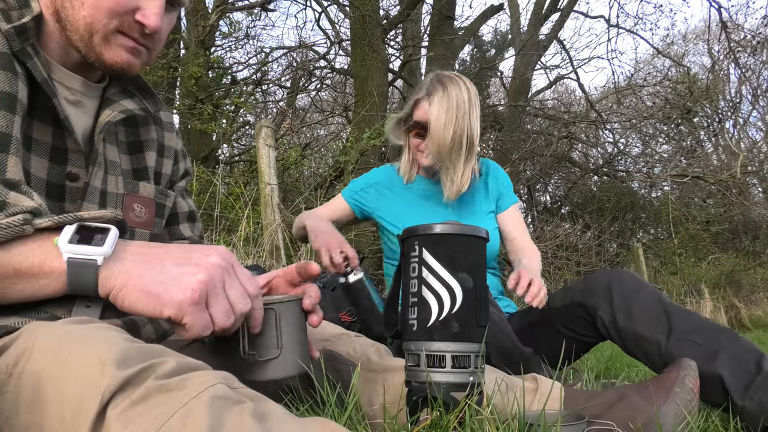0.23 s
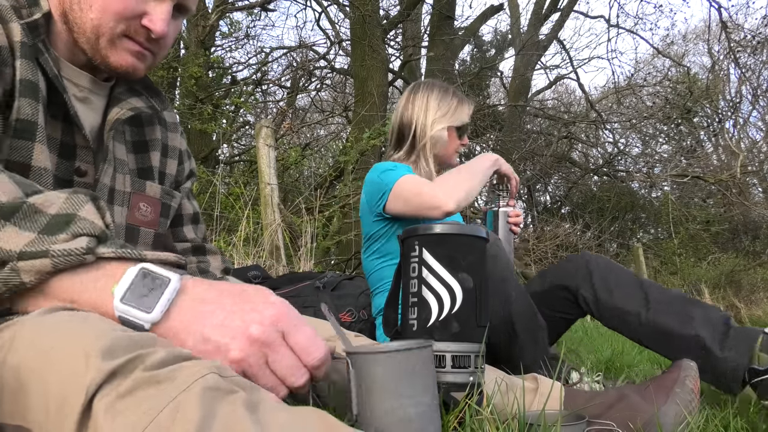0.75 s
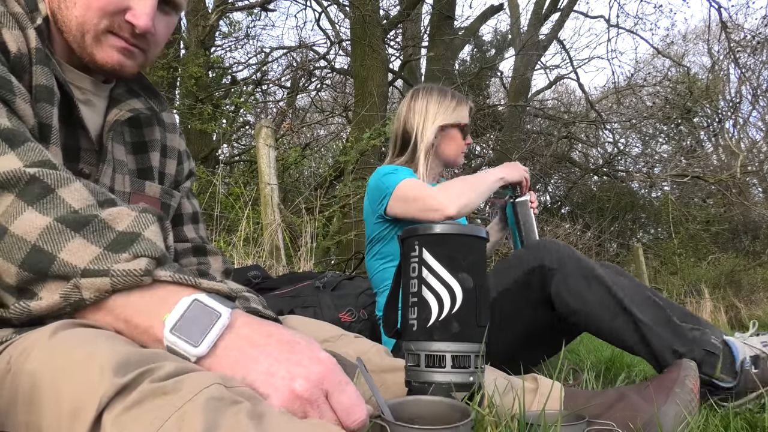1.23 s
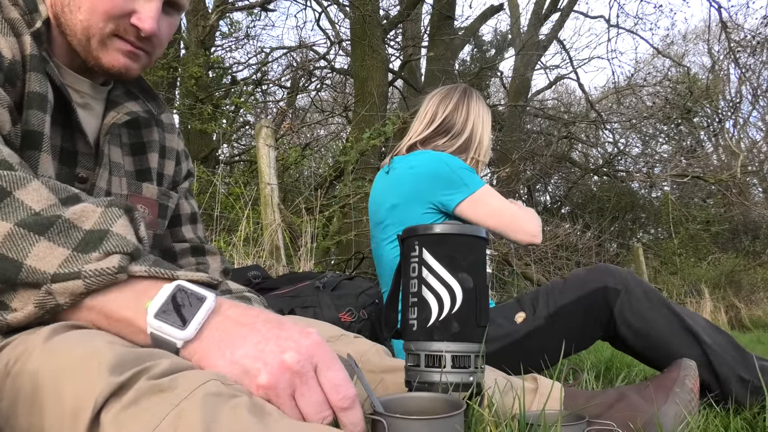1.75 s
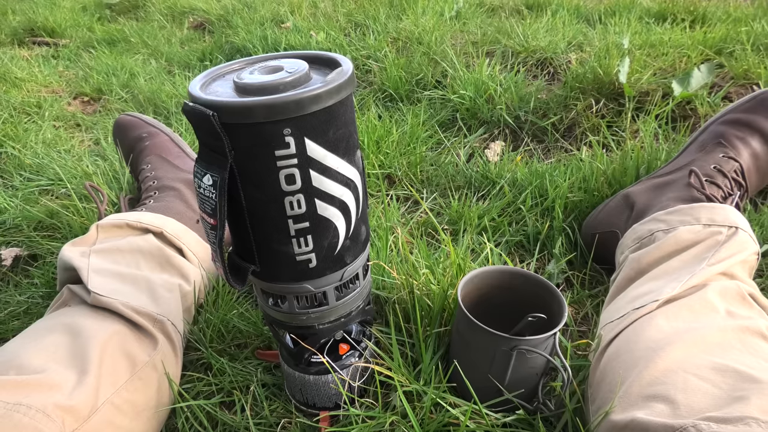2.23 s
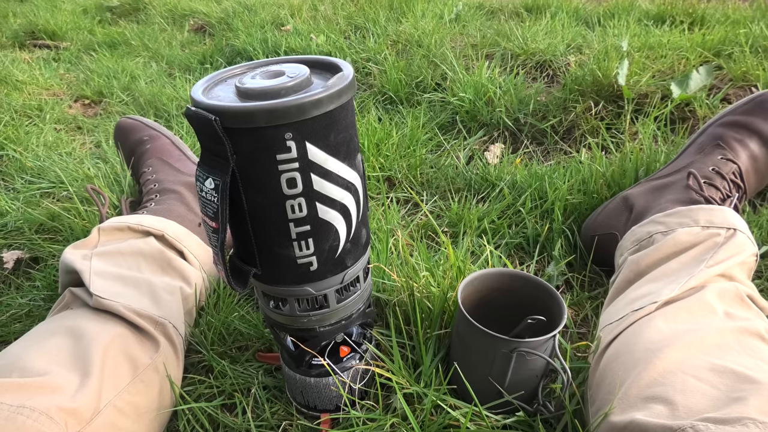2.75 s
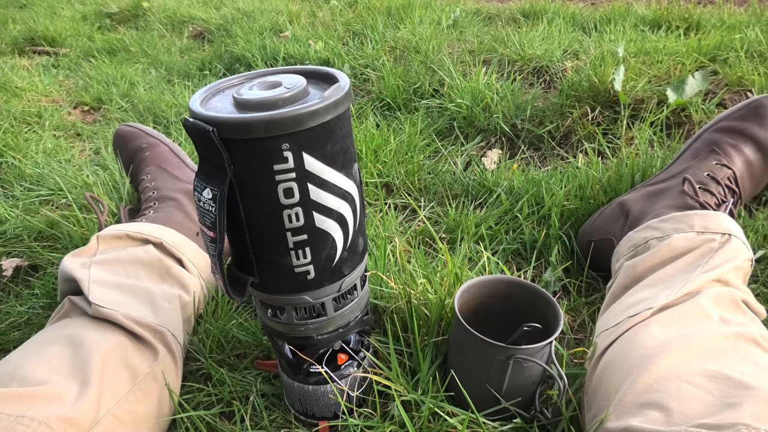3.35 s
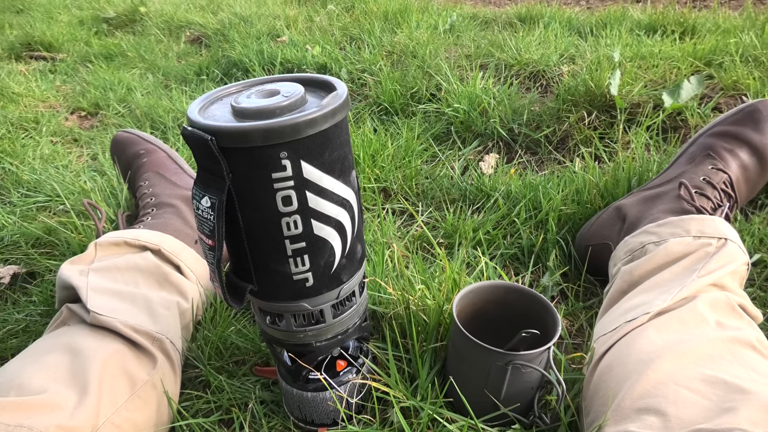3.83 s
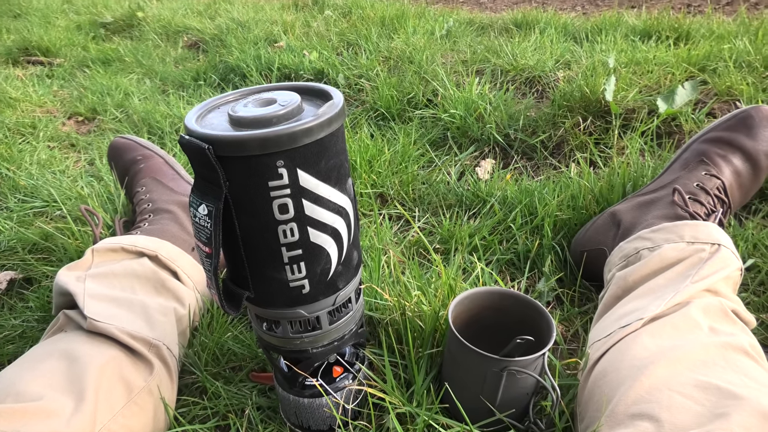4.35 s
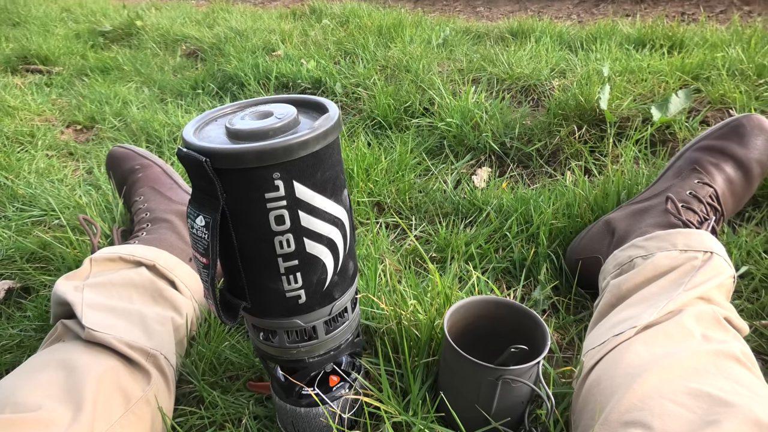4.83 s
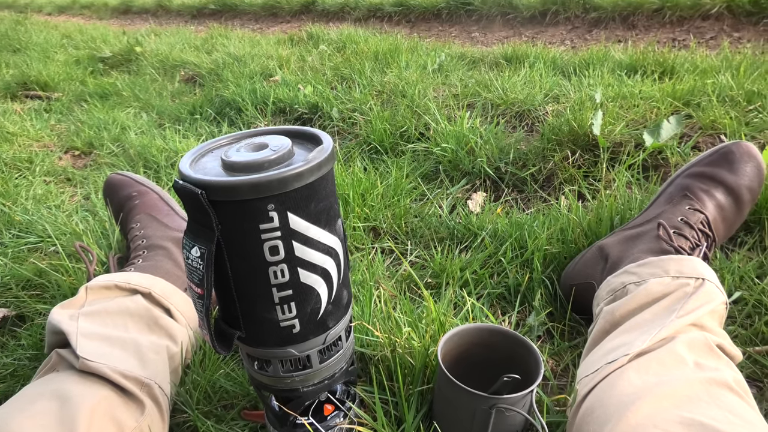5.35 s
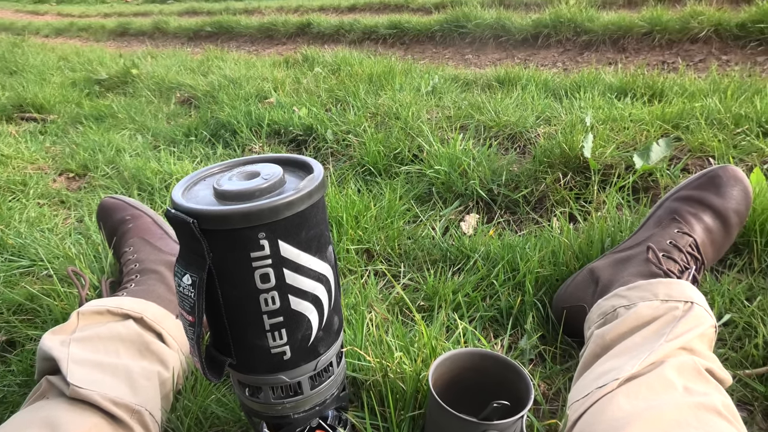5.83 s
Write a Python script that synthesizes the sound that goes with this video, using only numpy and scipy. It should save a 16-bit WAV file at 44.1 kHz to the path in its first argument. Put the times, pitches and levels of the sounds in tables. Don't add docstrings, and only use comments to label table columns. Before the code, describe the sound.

Rushing burner hiss with metal mug clinks, scrapes and a handle clack, then a closer, brighter hiss with microphone thumps and grass ticks.

```python
import sys
import numpy as np
from scipy import signal
from scipy.fft import rfft, irfft
from scipy.io import wavfile
from scipy.ndimage import uniform_filter1d, map_coordinates

SR = 44100
rng = np.random.default_rng(int(sys.argv[2]) if len(sys.argv) > 2 else 0)


def dump(signal):
    limited = np.clip(np.atleast_2d(signal).T, -1, 1)
    pcm = np.round(limited * 32767).astype(np.int16)
    wavfile.write(sys.argv[1], SR, pcm)


def to_linear_factor(level_db):
    exponent = np.asarray(level_db, float) / 20
    return 10 ** exponent


N = 269010
TIME_S = np.arange(N) / SR

# t/s, position (0 side, 1 front, 2 low down)
BEARING = [(0, 0.11), (1.72, 0.1), (1.86, 0.39), (2.1, 0.64), (2.3, 1), (2.55, 1.8), (2.8, 1.8),
           (3.0, 0.83), (3.3, 1.14), (3.6, 0.72), (4.0, .75), (4.3, 1.06), (4.7, 1.16), (5.1, 1.3),
           (5.6, 1.3), (6.1, 0.72)]
# t/s, nearness gain/dB, extra roar as it tips down/dB
NEARNESS = [(0, -0.5, -2), (.25, 0, 0), (1.45, 0, .5), (1.7, -2, 0), (1.86, 4.5, 0), (1.98, 7, -.5),
            (2.2, 6, -3), (2.8, 6, -1), (3.9, 5, -0.15), (5.25, 4.5, 0.3), (5.6, 3.5, -0.5), (6.1, 3, -1.5)]
# f/Hz, width/Hz, side density/dB, front/dB, low down/dB
CAVITIES = [(1430, 620, -6, -14, -14.5), (2204, 660, -5.5, -9, -10), (2760, 430, -2.5, -11, -12),
            (3355, 620, -6, -16, -16), (3920, 580, -9, -13.5, -15), (4610, 530, -6.5, -10.5, -13),
            (5133, 170, -4.5, 0.5, 0), (5470, 310, -9, -9.5, -7), (5690, 220, -4, -5.5, -2.5),
            (6123, 230, 3, -5, -18), (6520, 140, 4.5, -1.5, 1), (6556, 436, -4.5, 4, 3.5),
            (7400, 540, -3, -5, -7.5), (8125, 384, -1, 0.5, -2), (8600, 440, 1, -9.5, -4),
            (8990, 325, -5, -7.5, -11.5), (9600, 540, -15, -13, -11), (10320, 510, -6.5, -17.5, -19),
            (11260, 650, -9, -10, -18.5), (12300, 380, -6, -15, -21), (12650, 300, -0.5, -8.5, -11),
            (13450, 700, -12, -20, -22), (14400, 900, -16, -26, -25), (15600, 600, -18, -30, -25)]
# lowest f/Hz, highest f/Hz
FINS_HZ = (5000, 5600)
# f/Hz, width/Hz, depth 0-1 at side, front, low down
NULLS = [(2964, 146, 0, 0.75, .6), (4450, 340, 0, .75, 0.67), (6020, 230, 0, 0.093, 0.68),
         (7210, 460, .3, .5, .1), (7900, 480, 0, 0.27, 1), (9700, 350, .6, .3, .4),
         (10900, 380, 0.4, .5, 0.65)]
# f/Hz, density/dB
ROAR_SIDE = [(21, -54), (35, -21), (54, -21.5), (145, -4), (232, -1.5), (323, -9.5), (418, -2), (479, -6.5),
             (549, -24.5), (777, -14.5), (975, -31), (1300, -29), (1690, -52), (2860, -120)]
ROAR_FRONT = [(32, -46), (55, -19), (70, -24), (141, -4.5), (236, -1), (291, -0.5), (390, -6), (628, -19),
              (766, -30), (874, -27), (1300, -30.5), (1690, -55), (2860, -120)]
# t/s, level/dB
JOLTS = [(.42, -34), (1.0, -42), (1.83, -23.5), (2.08, -25), (2.45, -19), (2.94, -15.5), (3.3, -20),
         (3.82, -19.5), (4.2, -18.5), (4.6, -23), (5.45, -29), (6.0, -23.5)]
# f/Hz, level/dB, t60/s
MUG_MODES = [(1545, -39, 0.061), (2276, -6.5, 0.079), (2334, -5.5, 0.077), (3500, -9, 0.13),
             (3820, -6, 0.071), (4780, -3.5, 0.075), (5065, 4.5, .045), (5400, -5.5, 0.068),
             (6930, -18, .05), (7690, -6, 0.15), (7850, 7, 0.026), (8900, -22, .03), (10600, -22, 0.02),
             (12200, -21, .05), (13960, -4, .06), (1770, -23, 0.024), (2960, -24, .02), (4200, -16, .02)]
# t/s, peak/dB, favoured mode f/Hz, crack/dB, ring share of free t60
CLINKS = [
    (.003, -7, 5065, -4, 0.71),
    (0.0336, -14.5, 7850, -10, 0.71),
    (0.2782, -29, 4780, -11.5, 0.42),
    (0.6432, -24, 4780, -30, .4),
    (1.5874, -26.5, 4780, -32, 0.56),
]
# f/Hz, level/dB, t60/s
FLOOR_MODES = [(1553, -8, 0.085), (1600, -11, 0.06), (2300, -25, .03), (3000, -7, 0.032),
               (3870, -4.5, 0.05), (4620, -7, 0.033), (7270, -2, 0.033), (7670, -0.5, .045),
               (8160, -4, .04), (8800, -20, .025)]
# t/s, peak/dB
FLOOR_KNOCKS = [
    (0.5887, -17),
    (0.5925, -21.5),
    (0.6, -31),
]
# t/s, length/s, start level/dB, end level/dB
SCRAPES = [
    (.05, 0.033, -30, -37),
    (.372, .093, -32, -31),
    (0.594, 0.049, -35.5, -29),
    (0.649, 0.086, -32, -36),
    (1.543, 0.085, -40.5, -36),
]
# f/Hz, width/Hz, level/dB
SCRAPE_BODY = [(1630, 55, 4), (2430, 260, 4.5), (3810, 140, 7.5), (4600, 110, 8), (4830, 88, 10),
               (4870, 80, 3), (6260, 180, -12), (7000, 67, 6), (7600, 34, 12), (7800, 50, -37)]
# f/Hz, level/dB, t60/s
HANDLE_MODES = [(850, -17, 0.03), (1300, -15, 0.031), (1670, -11.5, .035), (2020, -18, 0.035),
                (2815, -3, 0.02), (3470, -21, .015), (3920, -3, 0.033), (4205, -0.5, 0.027),
                (4300, -2, 0.026), (4500, -12, 0.012), (5940, -5, .035), (6200, -13.5, .015),
                (7200, -7, .015), (8800, -1, .02), (9300, -2, 0.016), (11300, -11, 0.017),
                (12570, -4, .025), (14770, -9, .015)]
# t/s, peak/dB
HANDLE_DROPS = [
    (0.8203, -7),
    (0.8245, -27),
    (.856, -14.5),
    (0.8584, -20),
]
# mid t/s, length/s, rms level/dB, centre f/Hz, width/Hz
RUSTLES = [
    (1.05, .35, -49, 1500, 1200),
    (5.55, 0.34, -45.5, 2600, 4000),
    (5.59, .06, -47, 890, 350),
]
# t/s, peak/dB, centre f/Hz, width/octaves
TICKS = [(1.145, -31, 2500, 1.9), (1.172, -24, 4000, 1.8), (1.259, -29, 5000, 1.5), (1.545, -32, 4200, .6),
         (2.92, -22, 3000, 2.7), (3.009, -26, 3200, 1.5), (3.27, -32, 4500, 1.1), (3.311, -30.5, 1300, 1.6),
         (3.444, -25, 4500, 2.0), (3.474, -23, 3000, 2.5), (3.537, -30, 4300, .73), (3.585, -25, 4000, 1.4),
         (3.634, -20, 5500, .62), (3.67, -27, 4500, .54), (3.715, -20, 2540, 3.1), (3.862, -27, 4200, 1.1),
         (3.89, -20.5, 4500, 1.3), (6.05, -30, 2500, 2.2)]
# t/s, length/s, peak rms level/dB, first f/Hz, last f/Hz
CHIRPS = [
    (1.236, 0.071, -39.5, 3600, 4700),
    (1.31, .04, -54, 4500, 4520),
    (1.721, .015, -33.5, 3640, 3600),
    (1.726, .022, -35.5, 1863, 1710),
    (3.146, .023, -43, 3720, 3700),
    (5.39, .1, -49, 720, 940),
]
# t/s, peak/dB, centre f/Hz, width/octaves, length/ms
FINGER_KNOCKS = [(2.0724, -12, 6100, 1.26, 4.2), (2.0768, -9.5, 5200, 0.75, 3.7),
                 (2.073, -24.5, 2900, 1, 7.), (2.7922, -15, 9700, 0.27, 1.7),
                 (2.7925, -15.5, 5300, 1.2, 1.9), (2.7922, -19.5, 670, 1.2, 0.38),
                 (2.8295, -12.5, 5600, 1.9, 4.4), (2.8335, -11.5, 5140, 0.73, 4.6),
                 (2.8298, -25, 570, 0.72, 1.2), (4.451, -25.5, 650, .9, 2.6),
                 (5.0124, -14, 1880, 1.17, 0.11), (5.0125, -15.5, 3100, 1, .15)]

JET_DB, ROAR_DB = -38.5, -34.5
RESTING_DB, HELD_DB, TIRING_DB_PER_S = -45, -25, -1.6
LIFT_S, LIFT_TIME_S, JOLT_HALF_WIDTH_S = 1.72, 0.05, 0.092
TREMOR_HZ, TREMOR_DB, HOUSING_HZ, HOUSING_DB = 11.5, -31, 31, -50
BITE_DB_PER_S, LET_GO_DB_PER_S = 1900, 1500
TICK_MS, TICK_MS_PER_DB = 1.8, 0.46
ARCH_DB, ARCH_TOP, GLIDE_EASE = 18, 0.45, 2.3


def rms_one(x):
    return x / np.sqrt(np.mean(x ** 2) + 1e-20)


def in_time(rows):
    s, *columns = np.transpose(rows)
    return [np.interp(TIME_S, s, column) for column in columns]


def drift(rate_hz):
    r = np.exp(-80 * np.pi * rate_hz / SR)
    white = rng.standard_normal(N // 40 + 2002)
    slow = signal.lfilter([1], [1, -2 * r, r * r], white)[2000:]
    return np.interp(np.arange(N) / 40, np.arange(len(slow)), rms_one(slow))


def band_pass(x, order, edges_hz):
    return signal.sosfilt(signal.butter(order, edges_hz, "band", fs=SR, output="sos"), x)


def resonate(x, hz, width_hz):
    r = np.exp(-np.pi * width_hz / SR)
    gain = (1 - r * r) / 2
    return signal.lfilter([gain, 0, -gain], [1, -2 * r * np.cos(2 * np.pi * hz / SR), r * r], x)


def resonate_twice(x, hz, width_hz):
    return resonate(resonate(x, hz, width_hz), hz, width_hz)


def strike(modes, s, strengths_db, damping=1):
    hz, level_db, t60_s = np.transpose(modes)[:, :, None]
    t = TIME_S[:SR // 4]
    decay_db = level_db + np.reshape(strengths_db, (-1, 1)) - 60 * t / (t60_s * damping)
    ring = np.sum(to_linear_factor(decay_db) * np.sin(2 * np.pi * hz * t), axis=0)
    out = np.zeros(N)
    high_pass = signal.butter(2, 900, "high", fs=SR, output="sos")
    out[round(s * SR):][:len(t)] = signal.sosfilt(high_pass, ring)
    return out


def add_snap(out, s, peak_db, hz, octaves, ms):
    t = np.arange(round(ms * SR / 250) + 64) / (ms * SR / 1000)
    spectrum = rfft(rng.standard_normal(len(t)) * np.exp(-t ** 2 * 0.68))
    even = spectrum / uniform_filter1d(np.abs(spectrum), size=7)
    crackle = irfft(even, len(t)) * np.exp(-t ** 2 / 2)
    edges_hz = np.clip(hz * 2 ** (np.array([-0.5, 0.5]) * octaves), 50, 0.45 * SR)
    snap = band_pass(crackle, 3, edges_hz)
    at = round(s * SR)
    out[at:at + len(snap)] += (to_linear_factor(peak_db) * snap / np.abs(snap).max())[:N - at]


def jet(level_db):
    (bearing,) = in_time(BEARING)
    white = rng.standard_normal((3, N))
    together_db = 0.46 * drift(25.0)
    out, fins = np.zeros(N), np.zeros(N)
    for k, (hz, width_hz, *by_bearing_db) in enumerate(CAVITIES):
        band = white[k % 3]
        for _ in range(3):
            band = resonate(band, hz, 1.886 * width_hz)
        heard_db = np.interp(bearing, [0, 1, 2], by_bearing_db)
        group = fins if FINS_HZ[0] < hz < FINS_HZ[1] else out
        group += to_linear_factor(heard_db + together_db + 1.25 * drift(2.15)) * band
    rise = 0.05 * np.clip(bearing - 1, 0, 1)
    out += map_coordinates(fins, [np.cumsum(1 + rise - rise.mean())], order=3, mode="nearest")
    for hz, width_hz, *by_bearing in NULLS:
        depth = np.interp(bearing, [0, 1, 2], by_bearing)
        out = out - depth * resonate(out, hz, width_hz)
    return to_linear_factor(level_db + 10.5) * out


def roar(level_db):
    front = np.clip(in_time(BEARING)[0] * 1.76, 0, 1)
    edges_hz = 32 * 2 ** (np.arange(23) / 4)
    white = rng.standard_normal((2, N + SR // 4))
    out = 0
    for k, (low, high) in enumerate(zip(edges_hz, edges_hz[1:])):
        band = band_pass(white[k % 2], 3, [low, high])[-N:]
        side_db, front_db = (np.interp(np.log(low * high) / 2, np.log(hz), db)
                             for hz, db in (np.transpose(ROAR_SIDE), np.transpose(ROAR_FRONT)))
        out = out + to_linear_factor(side_db + front * (front_db - side_db) + 0.9 * drift(3.0)) * band
    return to_linear_factor(level_db - 0.06) * out / np.sqrt(uniform_filter1d(out ** 2, size=SR))


def wobble():
    slow = signal.butter(1, [1.5, 9.0], "band", fs=SR / 40, output="sos")
    steep = signal.butter(5, 25.0, fs=SR / 40, output="sos")
    lumps = signal.sosfilt(np.vstack([slow, steep]), rng.standard_normal(N // 40 + 3002))[3000:]
    lumps = lumps / np.sqrt(uniform_filter1d(lumps ** 2, size=300))
    swings = signal.resample_poly(lumps, 40, 1)[:N]
    since_lift_s = TIME_S - LIFT_S
    held = np.clip(since_lift_s / LIFT_TIME_S, 0, 1)
    grip = to_linear_factor(RESTING_DB + held * (HELD_DB - RESTING_DB + TIRING_DB_PER_S * since_lift_s))
    jolts = sum(to_linear_factor(db) * np.exp(-((TIME_S - s) / JOLT_HALF_WIDTH_S) ** 2) for s, db in JOLTS)
    white = rng.standard_normal((2, N))
    shake = resonate(resonate(white[0], TREMOR_HZ, 5.0), TREMOR_HZ, 8.0)
    tremor = to_linear_factor(TREMOR_DB) * rms_one(shake)
    boom = to_linear_factor(HOUSING_DB) * rms_one(resonate_twice(white[1], HOUSING_HZ, 14.0))
    return np.hypot(grip, jolts) * swings + to_linear_factor(held * 22 - 22) * (tremor + boom)


def spoon():
    out = np.zeros(N)
    for s, peak_db, spot_hz, crack_db, share in CLINKS:
        near = np.exp(-(np.log(np.array(MUG_MODES)[:, 0] / spot_hz) / 0.035) ** 2)
        scatter_db = 1.5 * rng.standard_normal(len(MUG_MODES))
        out += strike(MUG_MODES, s, peak_db - 6.0 + 2.1 * near + scatter_db, share)
        add_snap(out, s, crack_db, hz=5930, octaves=2.13, ms=3.2)
    for s, peak_db in FLOOR_KNOCKS:
        out += strike(FLOOR_MODES, s, peak_db)
        add_snap(out, s, peak_db + 5.5, hz=6500, octaves=3.9, ms=3.7)
    return out


def scrape():
    sizes = to_linear_factor(2.5 * np.minimum(rng.exponential(1, N), 4))
    slips = sizes * rng.choice([-1, 1], N) * (rng.random(N) < 9000 / SR)
    body = sum(to_linear_factor(db) * resonate(slips, hz, 1.2 * width_hz) for hz, width_hz, db in SCRAPE_BODY)
    rasp = resonate_twice(slips, 3800, 9000)
    both = rms_one(body) + to_linear_factor(-6.0) * rms_one(rasp)
    stroke = 0
    for s, length_s, first_db, last_db in SCRAPES:
        end_s = s + length_s
        drag_db = np.interp(TIME_S, [s, end_s], [first_db, last_db])
        bite_db = BITE_DB_PER_S * np.maximum(s - TIME_S, 0)
        let_go_db = LET_GO_DB_PER_S * np.maximum(TIME_S - end_s, 0)
        stroke = stroke + to_linear_factor(drag_db - bite_db - let_go_db)
    return stroke * to_linear_factor(1.7 * drift(60.0)) * rms_one(both)


def handle():
    out = np.zeros(N)
    for s, peak_db in HANDLE_DROPS:
        scatter_db = 1.5 * rng.standard_normal(len(HANDLE_MODES))
        out += strike(HANDLE_MODES, s, peak_db - 4.5 + scatter_db)
        add_snap(out, s, peak_db + 4.0, hz=4500, octaves=2.05, ms=1.9)
        add_snap(out, s, peak_db - 11.0, hz=5000, octaves=1.9, ms=22.0)
    return out


def rustles():
    out = np.zeros(N)
    grain = rng.standard_normal(N) * to_linear_factor(2.7 * drift(40.0))
    for s, length_s, db, hz, width_hz in RUSTLES:
        swell = np.cos(np.pi * np.clip((TIME_S - s) / length_s, -0.5, 0.5))
        out += to_linear_factor(db) * swell * rms_one(resonate_twice(grain, hz, width_hz))
    return out


def ticks():
    out = np.zeros(N)
    for s, db, hz, octaves in TICKS:
        add_snap(out, s, db, hz, octaves, TICK_MS - TICK_MS_PER_DB * (db + 18))
    return out


def bird():
    out, flutter = 0, drift(150.0)
    for s, length_s, db, first_hz, last_hz in CHIRPS:
        part = np.clip((TIME_S - s) / length_s, 0, 1)
        hz = last_hz + (first_hz - last_hz) * (1 - part) ** GLIDE_EASE
        arch = np.interp(part, [0, ARCH_TOP, 1], [1, 0, 1]) ** 2
        level = to_linear_factor(db - ARCH_DB * arch + 1.5 * flutter) * (arch < 1)
        phase = 2 * np.pi * np.cumsum(hz + 40 * flutter) / SR
        out = out + np.sqrt(2) * level * np.sin(phase)
    return out


def finger_knocks():
    out = np.zeros(N)
    for row in FINGER_KNOCKS:
        add_snap(out, *row)
    return out


def scene():
    near_db, tip_db = in_time(NEARNESS)
    stove = jet(JET_DB + near_db) + roar(ROAR_DB + near_db + tip_db)
    mug = spoon() + scrape() + handle()
    handling = wobble() + rustles() + ticks() + finger_knocks()
    mono = stove + mug + handling + bird()
    return np.stack([mono, mono])


def band_limit(x):
    return signal.sosfilt(signal.butter(12, 16810, fs=SR, output="sos"), x)


def record(dry):
    rounded = np.tanh(dry) * 0.97
    low_pass = signal.ellip(10, 0.5, 45, 15850, fs=SR, output="sos")
    return band_limit(signal.sosfilt(low_pass, rounded))


dry = scene()
out = record(dry)
dump(out)
```